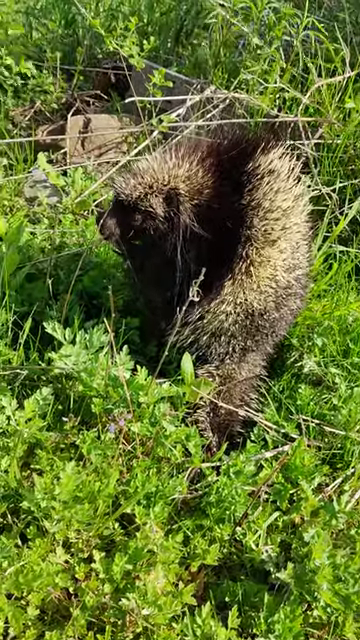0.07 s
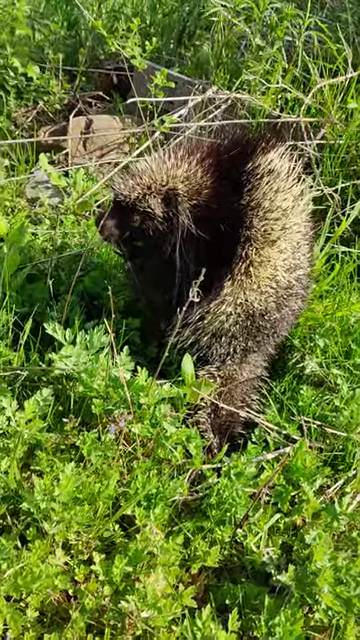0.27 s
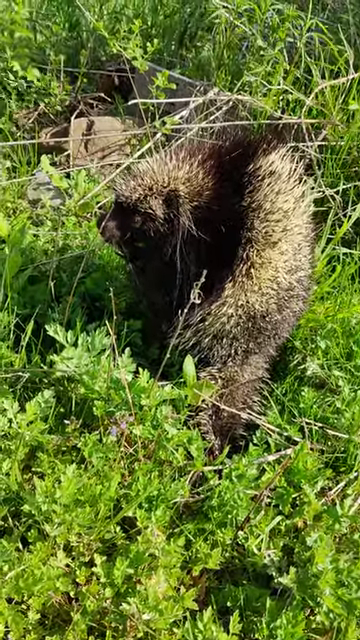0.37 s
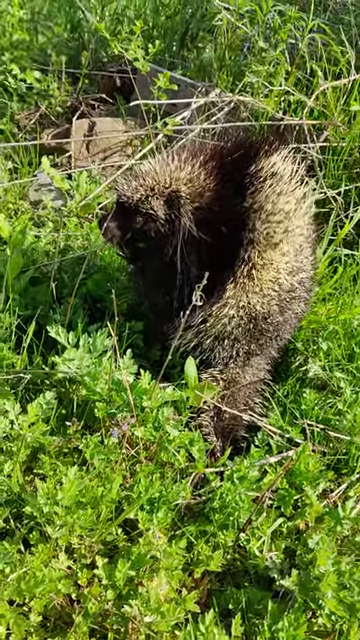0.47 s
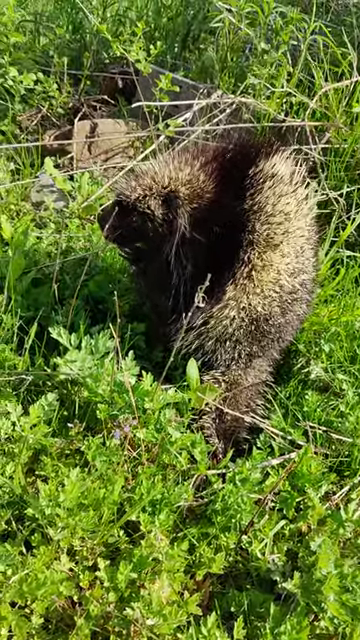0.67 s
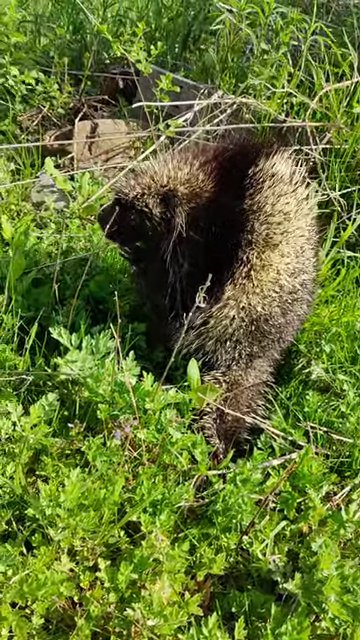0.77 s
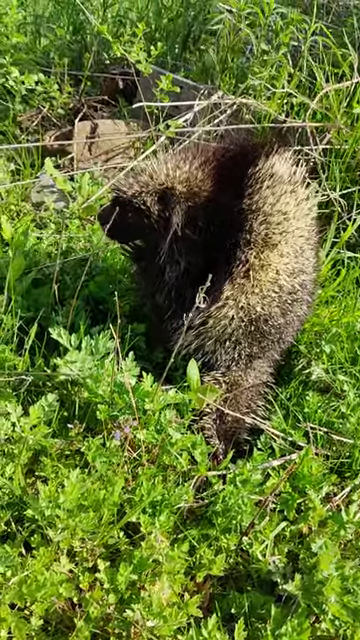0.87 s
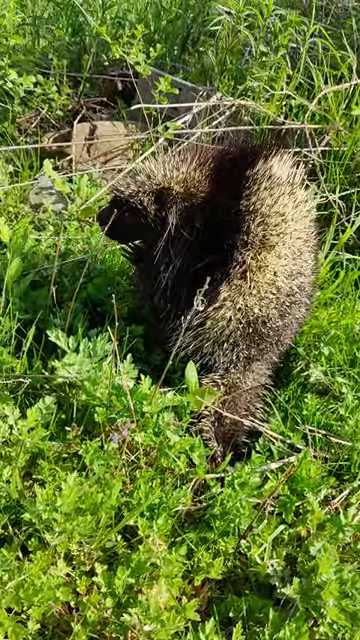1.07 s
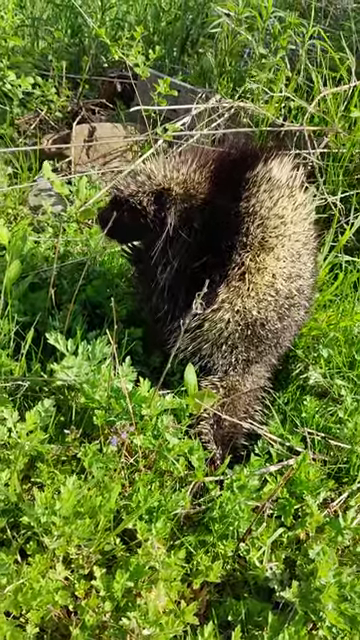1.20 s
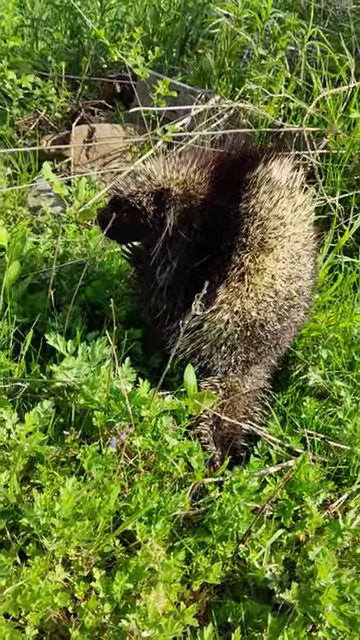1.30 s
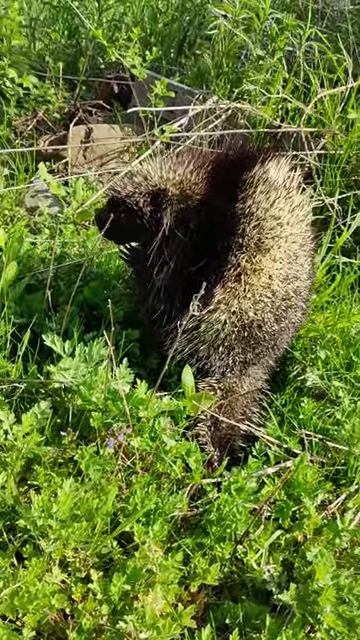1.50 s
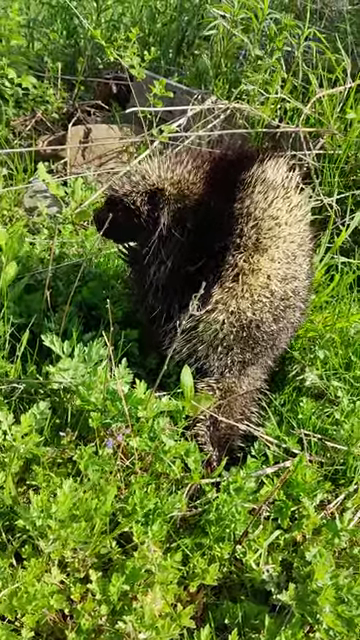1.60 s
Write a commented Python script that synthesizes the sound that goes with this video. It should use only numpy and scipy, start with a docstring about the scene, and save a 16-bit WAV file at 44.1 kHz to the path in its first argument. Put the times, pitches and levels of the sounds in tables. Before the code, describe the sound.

A porcupine clacks its teeth close by, about nine sharp, high clicks a second throughout, drifting slightly right. Wind rumbles on the microphone, buffeting hardest around 0.6 seconds and easing after 1 second. A distant bird gives faint falling chirps near the start, at 1.2 and at 1.6 seconds. Underneath are a soft outdoor hush, a faint motor drone and, from about 1 second, a barely audible trill.

```python
"""Porcupine clacking in the weeds

A porcupine clacks its teeth about nine times a second, a little to the right. Each clack is a
double tooth contact over a soft knock of the jaw, scattered by the plants around it. Wind buffets
the microphone over a faint outdoor hush; far off a motor drones, a bird gives falling chips and
a trill starts up."""
import sys
import numpy as np
from scipy import signal
from scipy.fft import rfft, irfft, next_fast_len
from scipy.io import wavfile
from scipy.ndimage import uniform_filter1d

SR = 44100
rng = np.random.default_rng(int(sys.argv[2]) if len(sys.argv) > 2 else 0)


def wav_record(signal):
    """Record a signal, one row per channel, as 16-bit PCM in the file named by sys.argv[1]."""
    frames = np.transpose(np.atleast_2d(signal))
    bounded = np.clip(frames, -1, 1)
    # unit amplitude maps onto the largest positive 16-bit level
    quanta = np.round(bounded * 32767).astype(np.int16)
    wavfile.write(sys.argv[1], SR, quanta)


N = 72765
TIME = np.arange(N) / SR


def from_db(db):
    """Decibels to gain."""
    return 10 ** (np.asarray(db) / 20)


def rms_one(x):
    """Scale to unit power."""
    return x / np.sqrt(np.mean(x ** 2) + 1e-20)


def in_time(rows):
    """Draw a curve through each column of timed breakpoints."""
    times, *columns = np.transpose(rows)
    return [np.interp(TIME, times, column) for column in columns]


def noise(spectrum):
    """Unit-power noise coloured by rows of Hz and dB."""
    hz, db = np.transpose(spectrum)
    size = next_fast_len(N)
    bins = np.maximum(np.fft.rfftfreq(size, 1 / SR), 1)
    colour = from_db(np.interp(np.log(bins), np.log(hz), db))
    return rms_one(irfft(rfft(rng.standard_normal(size)) * colour, size)[:N])


def evened(x, seconds):
    """Take the chance swells out of a noise."""
    size = int(seconds * SR)
    return x / np.sqrt(uniform_filter1d(uniform_filter1d(x ** 2, size), size) + 1e-6)


def burst(hz, width_hz):
    """A few cycles that swell and die at once, peaking in the middle of a 20 ms frame."""
    t = np.arange(-(SR // 100), SR // 100) / SR
    return np.exp(-(np.pi * width_hz * t) ** 2) * np.cos(2 * np.pi * hz * t)


def tail(t60_s):
    """A dying spray of small reflections, unit energy."""
    t = np.arange(SR // 12) / SR
    spray = rng.standard_normal(len(t)) * np.exp(-np.log(1000) * t / t60_s)
    return spray / np.sqrt(np.sum(spray ** 2))


def add(out, start_s, x):
    """Mix x in from the given time."""
    i = max(int(round(start_s * SR)), 0)
    out[i:i + len(x)] += x[:max(len(out) - i, 0)]


def wind():
    """Slow eddies rumble and fast ones flutter on each mic port; hard buffets choke the right one."""
    # Gusts on the left. Each row: time in seconds, relative level in dB.
    left_gusts = [(0.0, -37), (0.11, -29.5), (0.145, -43), (0.195, -21), (0.284, -49), (0.309, -37.5),
                  (0.494, -55.5), (0.584, -19), (0.693, -34), (0.713, -24.5), (0.928, -60), (0.973, -42),
                  (1.008, -55.5), (1.117, -48.5), (1.172, -46.5), (1.212, -31), (1.287, -64), (1.302, -60),
                  (1.507, -61), (1.537, -38.5), (1.601, -49), (1.646, -42.5)]
    # Gusts on the right. Each row: time in seconds, relative rumble and flutter levels in dB.
    right_gusts = [(0.0, -28, -50), (0.03, -29, -71), (0.12, -36.5, -62.5), (0.304, -20.5, -33.5),
                   (0.359, -29, -52.5), (0.389, -53, -49), (0.414, -15.5, -34), (0.524, -31, -29),
                   (0.569, -13.5, -15), (0.703, -34, -50.5), (0.753, -22.5, -36.5), (0.813, -34, -64),
                   (0.838, -35.5, -37), (0.933, -30.5, -59), (0.968, -43, -85), (1.028, -52, -63.5),
                   (1.053, -38, -51.5), (1.078, -49, -82), (1.112, -29.5, -57.5), (1.252, -47.5, -69.5),
                   (1.277, -65, -71), (1.646, -62, -87)]
    # Colours of the slow and fast eddies. Each row: frequency in Hz, relative level in dB.
    rumble_colour = [(15, -22.5), (30, -1), (65, 7), (110, -2), (170, -18), (260, -47.5), (500, -62.5),
                     (1500, -104.5)]
    flutter_colour = [(90, -32.5), (150, 3.5), (200, 1.5), (310, -14), (400, -25.5), (520, -55),
                      (1500, -92)]
    # Hard eddies. Each row: centre in seconds, level before choking in dB, half width in seconds.
    buffets = [(0.567, -5, 0.0031), (0.5909, -3, 0.0017)]
    (left_db,), right_levels = in_time(left_gusts), in_time(right_gusts)
    ports = np.zeros((2, N))
    for side, (rumble_db, flutter_db) in enumerate([(left_db, left_db - 37), right_levels]):
        ports[side] += from_db(rumble_db + 1) * evened(noise(rumble_colour), seconds=0.022)
        ports[side] += from_db(flutter_db) * evened(noise(flutter_colour), seconds=0.01)
    for centre, db, half_width in buffets:
        u = (TIME - centre) / half_width
        ports[1] += from_db(db) * (1 - u ** 2) * np.exp(-u ** 2 / 2)
    ceiling, cutoff_hz = 0.75, 900
    choked = ports / (1 + (ports / ceiling) ** 4) ** (1 / 4)
    out = signal.sosfilt(signal.butter(3, cutoff_hz, fs=SR, output="sos"), choked)
    out[1] += gust_sputter()
    return out


def drone():
    """The low, swelling note of a distant motor."""
    # The motor's swells. Each row: time in seconds, level in dB.
    swells = [(0, -59), (.4, -52), (1.24, -54.5), (1.325, -68.5), (1.38, -56.5), (1.48, -47), (1.65, -61.5)]
    pitch_hz = 133
    return from_db(in_time(swells)[0]) * rms_one(np.sin(2 * np.pi * pitch_hz * TIME))


def air():
    """Faint, wide outdoor hush with a high hiss of grass and insects."""
    # Colour of the hush. Each row: frequency in Hz, relative level in dB.
    colour = [(30, 18), (100, 2.5), (250, 0), (500, -4), (900, -5), (1400, -13.5), (2300, -20),
              (3400, -18.5), (5000, -25), (6900, -14.5), (7800, -19), (9000, -26), (12000, -40.5),
              (15000, -67)]
    level_db, centre_share = -63.5, 0.25
    centre = np.sqrt(centre_share) * noise(colour)
    sides = np.sqrt(1 - centre_share) * np.array([noise(colour), noise(colour)])
    return from_db(level_db) * (centre + sides)


def bird():
    """Whistles off to the right that swell and bend downward, blurred by distance."""
    # The chips. Each row: start and length in seconds, first and last pitch in Hz, relative level in dB.
    chips = [(.038, 0.08, 4720, 3060, -61.5), (0.247, 0.059, 3910, 3150, -77.5),
             (1.09, 0.044, 4440, 3950, -76), (1.225, 0.1, 4570, 2840, -63), (1.351, .09, 4360, 3050, -78.5),
             (1.588, 0.11, 4440, 3850, -65.5)]
    direct = np.zeros(N)
    for start, length, first_hz, last_hz, db in chips:
        u = np.linspace(0, 1, int(length * SR))
        hz = first_hz + (last_hz - first_hz) * np.sin(np.pi / 2 * u ** 1.125) ** 2
        swell_db = np.interp(u, [0, 0.32, 1], [-24, 0, -20.5])
        envelope = from_db(db + swell_db) * np.abs(np.sin(np.pi * u)) ** 0.5
        add(direct, start, envelope * np.sin(2 * np.pi * np.cumsum(hz) / SR))
    return np.array([from_db(side_db) * (direct + signal.fftconvolve(direct, tail(t60_s=0.062))[:N])
                     for side_db in (-9, 0)])


def teeth():
    """Two contacts ring the incisors and knock the jaw; plants and ground throw the ring back."""
    # The clacks. Each row: peak time in seconds, level in dB, centre pitch in Hz, gap between contacts in
    # seconds, then relative dB of the second contact, top sizzle, upper ring and ground echo.
    clacks = [(0.0817, -43, 6740, .0013, -5, -12, 2.5, -19), (0.1887, -43.5, 6730, .0013, -8, -22, 4, -8),
              (.3058, -42, 6880, .0013, -5.5, -45, -0.5, -13), (.423, -45, 6660, .0013, -1, -38.5, 3.5, -4),
              (0.5297, -43.5, 6900, .00128, 0, -18.5, 2, -8),
              (0.6368, -42, 6730, .00115, -7, -15.5, 1.5, -6),
              (0.7413, -43.5, 6530, .0014, 0, -13, -1.5, -8),
              (.8534, -43.5, 6380, .00088, -2.5, -5.5, -2.5, -27),
              (0.9777, -46, 6370, .00086, -7, -21, 0.5, -19),
              (1.0942, -46.5, 6560, .00084, 4, -22.5, -2.5, -15),
              (1.2022, -44.5, 6500, .00083, 2, -17.5, 1, -18.5),
              (1.3284, -44, 6580, .00081, 2, -21.5, -3.5, -22),
              (1.4421, -44, 6660, .00083, 1.5, -19, -9, -18),
              (1.5518, -43, 6700, .00081, -2.5, -21.5, -6.5, -11)]
    split_hz = 960   # the incisors ring at two close pitches, the upper one more damped
    left_lead_s, left_lift_hz = 0.00011, 407   # the left hears a clack earlier and brighter
    near_plants_db, far_plants_db, ground_delay_s = -4, -11.5, 0.0124
    jaw_db, jaw_lag_s = (-49.5, -56.5), 0.00082   # levels left and right
    jaw = burst(hz=574, width_hz=282)
    crack = from_db(-11) * burst(hz=2820, width_hz=3840)
    out = np.zeros((2, N))
    for time, db, hz, gap, second_db, sizzle_db, upper_db, echo_db in clacks:
        start = time - len(jaw) / 2 / SR
        left_db = -4.5 - 6.5 * time   # the clacks shift to the right as the head turns
        edge = crack + from_db(sizzle_db) * burst(hz=12000, width_hz=1400)
        for side, is_left in enumerate((1, 0)):
            low_hz = hz + is_left * left_lift_hz - split_hz / 2
            upper = from_db(upper_db) * burst(low_hz + split_hz, width_hz=800)
            ring = (burst(low_hz, width_hz=670) + upper) / 2
            click = from_db(is_left * left_db) * ring + from_db(is_left * left_db / 2) * edge
            # Both contacts, the scatter of near plants, then an echo smeared by rough ground.
            paths = signal.unit_impulse(SR // 30)
            add(paths, gap, from_db([second_db]))
            add(paths, 2 * gap, from_db(near_plants_db) * tail(t60_s=0.031))
            add(paths, ground_delay_s, from_db(echo_db) * tail(t60_s=0.016))
            add(out[side], start - is_left * left_lead_s, from_db(db) * np.convolve(paths, click))
            far_scatter = np.convolve(tail(t60_s=0.12), ring)
            add(out[side], start + 2 * gap, from_db(db + far_plants_db) * far_scatter)
            add(out[side], start + jaw_lag_s, from_db(jaw_db[side]) * jaw)
    return out


def gust_sputter():
    """The strongest gusts bring small pops and a low hiss to the mic port."""
    # The pops. Each row: centre in seconds, level in dB, pitch in Hz, bandwidth in Hz.
    pops = [(.4035, -46.5, 449, 130), (.555, -51, 900, 330), (.592, -40, 1110, 460)]
    # Colour of the hiss. Each row: frequency in Hz, relative level in dB.
    hiss_colour = [(300, -17), (480, 5), (700, -6), (1100, -28.5), (2000, -67)]
    # Swell of the hiss. Each row: time in seconds, level in dB.
    hiss_swell = [(.515, -87), (.558, -36.5), (.62, -52.5), (.69, -86.5)]
    out = from_db(in_time(hiss_swell)[0]) * noise(hiss_colour)
    for centre, db, hz, width_hz in pops:
        pop = burst(hz, width_hz)
        add(out, centre - len(pop) / 2 / SR, from_db(db) * pop)
    return out


def trill():
    """A far, fast-pulsing trill, perhaps a toad: a narrow band of noise around a gliding pitch."""
    # The trill's contour. Each row: time in seconds, level in dB, pitch in Hz.
    contour = [(.93, -97, 1600), (1.05, -76.5, 1800), (1.15, -77, 1820), (1.36, -78, 1770),
               (1.65, -79.5, 1750)]
    pulses_per_s, blur_hz = 56, 79
    db, hz = in_time(contour)
    pulses = 1 + 0.3 * np.sin(2 * np.pi * pulses_per_s * TIME)
    blur = signal.sosfilt(signal.butter(2, blur_hz, fs=SR, output="sos"), rng.standard_normal((2, 2, N)))
    voice = ((blur[0] + 1j * blur[1]) * np.exp(2j * np.pi * np.cumsum(hz) / SR)).real
    return from_db(db) * rms_one(evened(voice, seconds=0.023) * pulses)


def scene():
    """Teeth and wind up close, over a distant outdoor bed."""
    return teeth() + wind() + bird() + trill() + drone() + air()


def record(dry):
    """A steep low-pass trims the very top."""
    stop_hz = 16000
    return signal.sosfilt(signal.cheby2(12, 70, stop_hz, fs=SR, output="sos"), dry)


dry = scene()
out = record(dry)
wav_record(out)
```